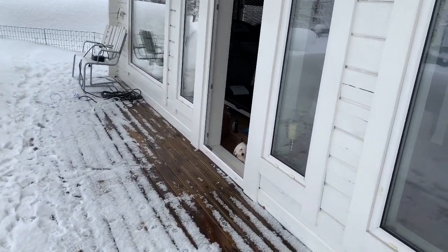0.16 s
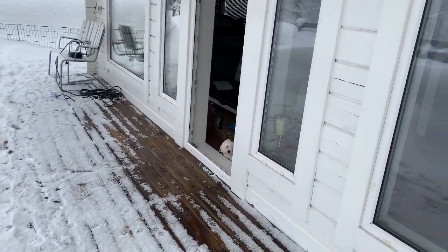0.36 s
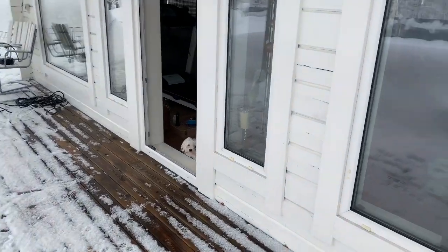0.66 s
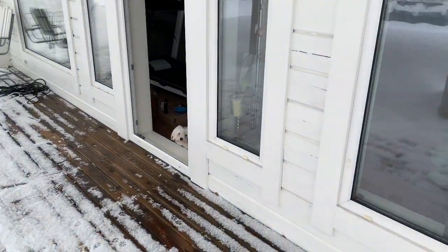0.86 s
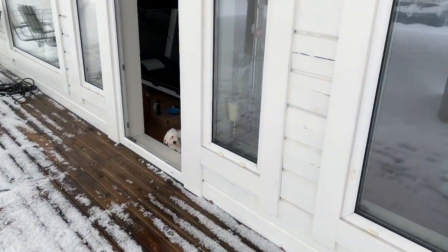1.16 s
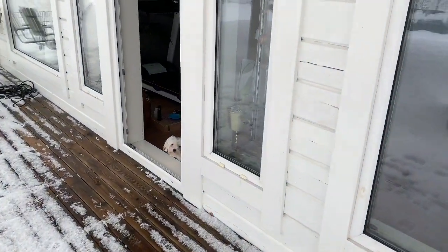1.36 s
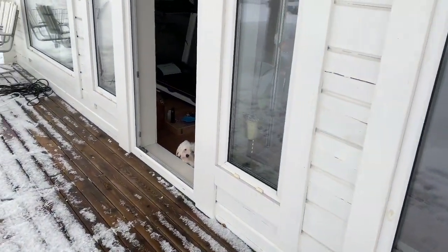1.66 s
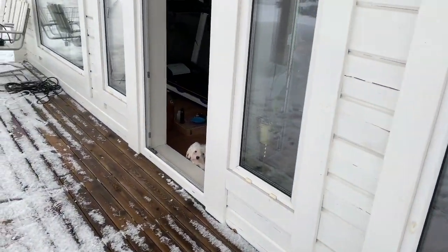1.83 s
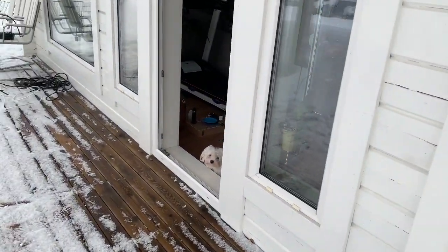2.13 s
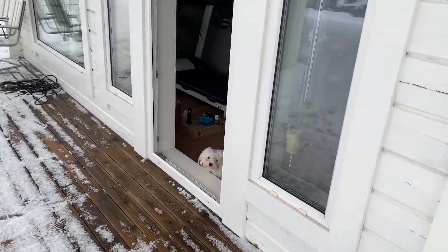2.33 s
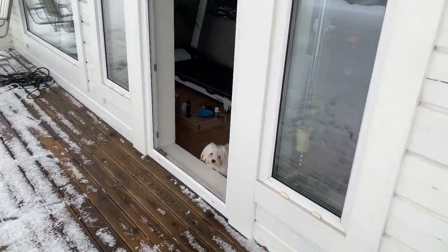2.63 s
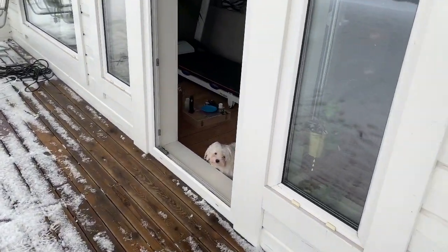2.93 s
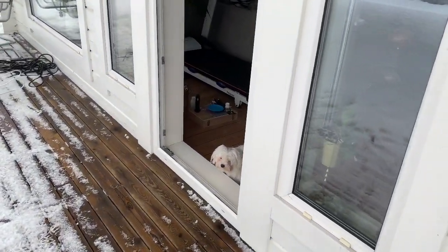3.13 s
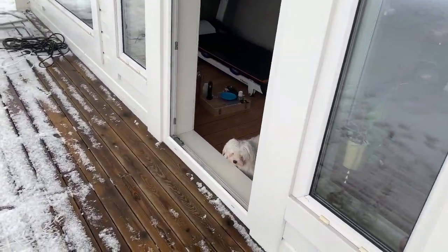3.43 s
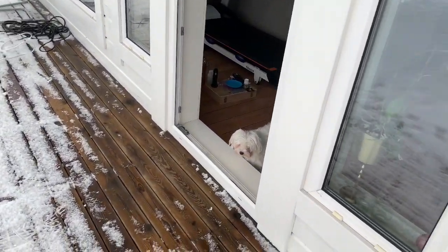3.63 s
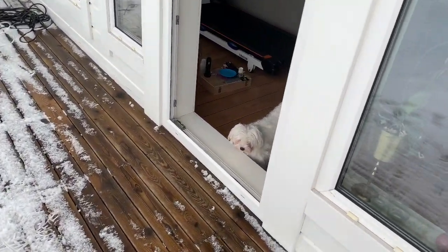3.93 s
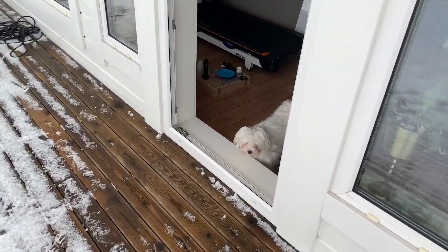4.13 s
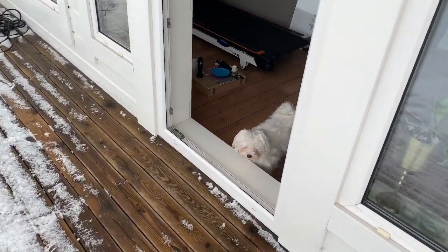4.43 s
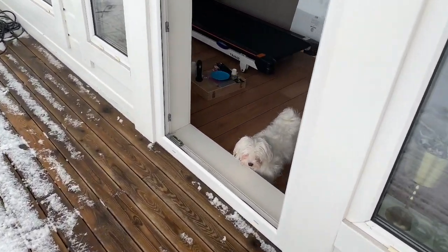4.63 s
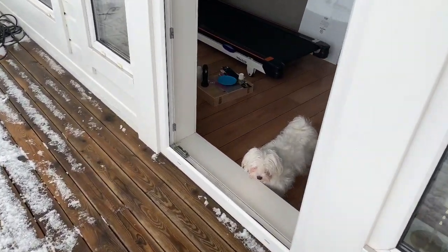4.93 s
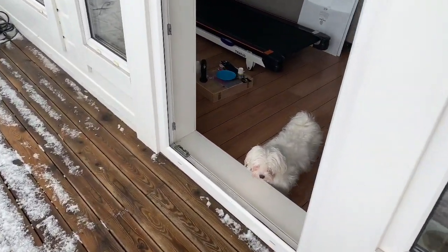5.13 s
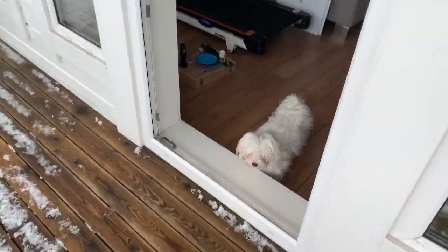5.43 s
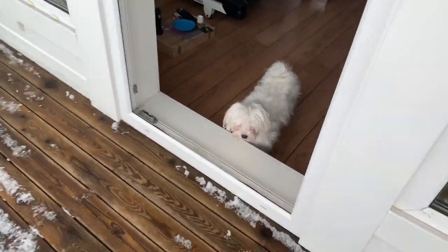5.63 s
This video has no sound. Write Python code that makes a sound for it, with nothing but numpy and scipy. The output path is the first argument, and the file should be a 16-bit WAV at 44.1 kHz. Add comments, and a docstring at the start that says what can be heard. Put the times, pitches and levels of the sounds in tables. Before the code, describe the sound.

Close, dry outdoor footsteps on a snow-dusted wooden deck, caught by a phone held above. Woody knocks with short low thuds arrive in uneven groups, each ringing briefly through the boards. Breathy scuffs of soles and clothes, tiny clicks and dull bass bumps fill the spaces over a very faint steady hiss. The last second has no strong step, just shuffling.

```python
"""Footsteps on a wooden deck

Shoes knock and thud on boards right under a hand-held phone: decaying board modes, with hiss and clicks.
Bending waves bring each blow treble first and bass last, then return once from the end of the boards.
Between the steps soles and clothes scuff, as flickering bands of noise with a breathy hollow note; grit
ticks, slow shifts of weight bump in the bass, and only a faint steady hiss is left in the gaps."""
import sys
import numpy as np
from scipy import signal
from scipy.fft import rfft, irfft
from scipy.io import wavfile
from scipy.ndimage import uniform_filter1d

SR = 44100
rng = np.random.default_rng(int(sys.argv[2]) if len(sys.argv) > 2 else 0)


def wrap_up_sound(samples):
    """Save the sound to the file named by the first command line argument, as 16-bit audio."""
    columns = np.atleast_2d(samples).T
    # keep every value between -1 and 1, then stretch to whole-number steps
    tamed = np.clip(columns, -1, 1)
    steps = np.round(tamed * 32767).astype(np.int16)
    wavfile.write(sys.argv[1], SR, steps)


N = 255162


def undb(db):
    """Amplitude gain of a level in dB."""
    return 10 ** (np.asarray(db) / 20)


def on_log(hz, table):
    """Value of an (Hz, value) table, straight on a log-frequency axis."""
    table_hz, values = np.transpose(table)
    return np.interp(np.log(np.maximum(hz, 1)), np.log(table_hz), values)


def band(x, hz, width):
    """Resonant band-pass, gain 1 at the centre."""
    b, a = signal.iirpeak(min(hz, 0.45 * SR), hz / width, fs=SR)
    return signal.lfilter(b, a, x)


def noise(hz, width, size=N):
    """Two unrelated noises in one band, rms 1."""
    x = band(rng.standard_normal((2, size)), hz, width)
    return x / x.std()


def steep(hz, width, size=N):
    """Noise through the same resonance twice, for steeper skirts; rms 1."""
    each_width = 1.53 * width  # two passes narrow the band
    x = band(noise(hz, each_width, size), hz, each_width)
    return x / x.std()


def walk(rate):
    """Random levels that slew to a new value every 1 / rate s; spread near 1."""
    hold = int(SR / rate)
    levels = np.repeat(rng.standard_normal(N // hold + 1), hold)
    return 1.57 * uniform_filter1d(levels, hold)[:N]


def grit(size, spread_db, grain_s=0.0012):
    """Crushed crystals: a gain that jumps grain by grain, now and then far up; rms 1."""
    hold = int(grain_s * SR)
    grains = undb(spread_db * rng.exponential(size=size // hold + 1))
    gain = np.repeat(grains, hold)[:size]
    return gain / np.sqrt(np.mean(gain ** 2))


def fade(t, t60, rise):
    """Exponential onset with time constant rise after t = 0, times a decay of 60 dB in t60 s."""
    t = np.maximum(t, 0)
    return (1 - np.exp(-t / rise)) * 1000. ** (-t / t60)


def peak_one(x):
    """Scales each draw to peak 1."""
    return x / np.abs(x).max(axis=1, keepdims=True)


def add(out, x, s):
    """Mixes x into out from time s on."""
    i = int(s * SR)
    out[:, i:i + x.shape[1]] += x[:, :N - i]


# Spectrum of the faint steady hiss. Each row: frequency in Hz, relative level in dB per Hz.
FAINT_SPECTRUM = [(20, -1), (40, -0.5), (300, -21.5), (1500, -32), (4000, -55.5), (16000, -28.5)]
FAINT_DB = -71.5  # rms


def faint_hiss():
    """Faint steady background: white noise shaped by a fixed spectrum."""
    hz = np.arange(N // 2 + 1) * SR / N
    spectrum = rfft(rng.standard_normal((2, N))) * undb(on_log(hz, FAINT_SPECTRUM))
    x = irfft(spectrum, N)
    return undb(FAINT_DB) * x / x.std()


# Soles and clothes rubbing. Each row: start in seconds, length in seconds, low scuff at the start in dB,
# swell up to the end in dB, then middle scuff, bright swish and board grumble in dB re the low scuff,
# attack and release in seconds per 30 dB, hollow note in Hz, level of that note in dB re the low scuff.
SCUFFS = [(0, 0.13, -61, -14, -8, -41, 12, 0.026, 0.14, 843, -2.5),
          (0.317, 0.12, -70.5, 12, -5, -6, 7, 0.12, 0.11, 1530, -8.5),
          (0.468, 0.062, -59.5, 3.5, -6, -4.5, 18, 0.069, 0.042, 1630, -19),
          (0.641, 0.14, -70.5, 0.5, 5.5, -3, 18, 0.054, 0.16, 1184, -5.5),
          (0.84, 0.21, -75.5, -6.5, 0, -20, 8, 0.029, 0.12, 857, 6.5),
          (1.118, 0.064, -66, 10.5, -3, -7, 11, 0.088, 0.082, 1500, -10),
          (1.258, 0.3, -56, -17, -7.5, -23.5, 10.5, 0.039, 0.11, 910, -7),
          (1.857, 0.27, -65, 6.5, -5.5, -15, 4, 0.069, 0.53, 470, -5),
          (2.198, 0.38, -64, 1.5, -7.5, -14, 8, 0.043, 0.083, 2330, -6.5),
          (2.6, 0.16, -78, -7, 4, -17, 24, 0.032, 0.06, 426, 17),
          (2.813, 0.13, -67, 7.5, -1, -7, 7, 0.042, 0.095, 1366, -3),
          (3.039, 0.075, -55, -7, -16.5, -22, 5, 0.056, 0.054, 1100, -8.5),
          (3.203, 0.097, -64, 0, -17.5, -22.5, 12, 0.022, 0.062, 1930, -16.5),
          (3.606, 0.15, -58.5, -3, -2, -4.5, 0, 0.014, 0.14, 1295, -2.5),
          (3.797, 0.43, -66.5, 7.5, -14, -14, 12, 0.057, 0.1, 1070, -7.5),
          (4.278, 0.19, -66.5, 2.5, -1, -17, 9.5, 0.11, 0.046, 2450, 3.5),
          (4.441, 0.17, -63, 1.5, -3, -9, 7, 0.021, 0.09, 2450, -5.5),
          (4.638, 0.39, -65, 5, -6.5, -14.5, 0, 0.047, 0.13, 2170, -6),
          (5.125, 0.035, -69.5, -0.5, -7.5, -19, 6.5, 0.013, 0.066, 1810, -3.5),
          (5.29, 0.078, -62, 6, -2, -6.5, -3, 0.039, 0.078, 1210, 1),
          (5.451, 0.35, -65, -4, -7, -13.5, 2, 0.12, 0.063, 1170, -3),
          (5.668, 0.099, -67.5, 15.5, -8.5, -7, -31, 0.053, 0.14, 1560, -2.5)]
EDGE_DB = 30  # fall per attack or release time
SHORTEST_EDGE_S = 0.004


def stroke_db(row):
    """One scuff in time: its level in dB as it swells or sinks, and the dB its edges take off."""
    t = np.arange(N) / SR
    start, length, db, swell_db = row[:4]
    attack, release = np.maximum(row[7:9], SHORTEST_EDGE_S)
    before = np.maximum(start - t, 0) / attack
    after = np.maximum(t - start - length, 0) / release
    level_db = db + swell_db * np.clip((t - start) / length, 0, 1)
    return level_db, EDGE_DB * (before + after)


def scuffing(column, slower, rest_db):
    """Gain of one layer under all scuffs above its resting level; powers add."""
    power = undb(2 * rest_db)
    for row in SCUFFS:
        db, edges = stroke_db(row)
        layer_db = row[column] if column else 0  # column 0 is the low scuff itself
        power = power + undb(2 * (db + layer_db - edges / slower))
    return np.sqrt(power)


def rubbing(bands, gain, rate, flicker_db, grit_db):
    """Resonances fed by noise that catches and slips; each flickers and swells partly alone."""
    shared = walk(rate)
    x = np.zeros((2, N))
    for hz, width, db in bands:
        flicker = shared + walk(rate) + 0.4 * walk(8)
        x += undb(db + flicker_db * flicker) * steep(hz, width)
    x = x * uniform_filter1d(grit(N, grit_db), size=24)
    return gain * x / x.std()


# Grumble bands of the boards. Each row: centre in Hz, width in Hz, relative level in dB.
GRUMBLE_BANDS = [(43, 20, 5), (100, 110, -3.5), (211, 303, 2.5), (400, 160, -4.5)]
# What remains between scuffs: four levels in dB, for grumble, low scuff, middle scuff and bright swish.
REST_DB = [-90.5, -89.5, -86, -86]
AFTER_BLOW_DB, AFTER_BLOW_T60_S = -20.5, 0.38  # grumble that a blow leaves: dB re its knock, and decay
GRUMBLE_SLOWER = 1.84  # the boards load and settle this many times more slowly than the scuff


def board_grumble():
    """Low noise of the loaded boards: they work under each scuff and settle after each blow."""
    t = np.arange(N) / SR
    settle = np.zeros(N)
    for s, knock_db, *_ in BLOWS:
        left = undb(knock_db + AFTER_BLOW_DB) * fade(t - s, AFTER_BLOW_T60_S, rise=0.037)
        settle += left ** 2
    work = scuffing(column=6, slower=GRUMBLE_SLOWER, rest_db=REST_DB[0])
    return rubbing(GRUMBLE_BANDS, np.sqrt(work ** 2 + settle), rate=25, flicker_db=1.42, grit_db=0)


# Low, middle and bright rubbing bands. Each row: centre in Hz, width in Hz, relative level in dB.
SCUFF_LOW = [(337.5, 45, 3.5), (440, 87, 3), (834, 490, 12.5), (1260, 250, 5), (1630, 330, 3)]
SCUFF_MID = [(2250, 860, 1.5), (3100, 560, -4.5), (3800, 1000, -2), (5370, 1600, -6.5)]
SCUFF_TOP = [(5000, 1800, 0.5), (8100, 2800, 3.5)]
SLIPS_PER_S = 60  # new flicker levels a second


def scuffs():
    """Soles and clothes rub: three layers of gritty noise, each following the strokes at its own level."""
    out = np.zeros((2, N))
    layers = [(SCUFF_LOW, 0, REST_DB[1]), (SCUFF_MID, 4, REST_DB[2]), (SCUFF_TOP, 5, REST_DB[3])]
    for bands, column, rest_db in layers:
        gain = scuffing(column, slower=1, rest_db=rest_db)
        out += rubbing(bands, gain, SLIPS_PER_S, flicker_db=1.5, grit_db=2.0)
    return out


# Thinnest hiss of the rubbing. Each row: centre in Hz, width in Hz, relative level in dB.
THIN_HISS = [(13500, 4000, 0)]
HISS_DB, HISS_POWER = 26, 1.5  # gain on the swish raised to this power


def thin_hiss():
    """The highest rubbing noise: it grows faster than the bright swish."""
    swish = scuffing(column=5, slower=0.93, rest_db=REST_DB[3])
    gain = undb(HISS_DB) * swish ** HISS_POWER
    return rubbing(THIN_HISS, gain, SLIPS_PER_S, flicker_db=2.0, grit_db=1.5)


# Resonances of the hollow. Each row: multiple of the hollow note, width as a share of the note, level in dB.
HOLLOW = [(1, 0.2, -2), (2.25, 0.25, -7.5)]


def hollow_notes():
    """Each scuff has its own breathy note, from the hollow between sole, cloth and board."""
    out = np.zeros((2, N))
    for row in SCUFFS:
        start, length, attack, release, note_hz, note_db = *row[:2], *row[7:]
        db, edges = stroke_db(row)
        first = max(int((start - attack) * SR), 0)
        last = min(int((start + length + release) * SR), N)
        breath = np.zeros((2, last - first))
        for multiple, width, part_db in HOLLOW:
            breath += undb(part_db) * steep(multiple * note_hz, width * note_hz, size=last - first)
        level_db = db - edges + 1.3 * walk(30)
        add(out, undb(level_db[first:last] + note_db) * breath, first / SR)
    return out


# Grit ticks. Each row: start in seconds, peak level in dB, pitch in Hz.
TICKS = [(0.158, -59.5, 6060), (.501, -39, 7240), (1.537, -50, 2960), (2.072, -50.5, 3020),
         (3.604, -48, 1650), (4.879, -46.5, 6360), (4.905, -45.5, 3000), (4.937, -51, 2300),
         (5.063, -58, 5100), (5.693, -41, 1910)]


def ticks():
    """Grit clicks: tiny bursts of narrow noise that ring a few cycles."""
    out, t = np.zeros((2, N)), np.arange(SR // 20) / SR
    for s, db, hz in TICKS:
        click = steep(hz, 0.36 * hz, size=len(t)) * fade(t, t60=0.022, rise=0.00024)
        add(out, undb(db) * peak_one(click), s)
    return out


# Soft shifts of weight, bass only. Each row: start in seconds, peak level in dB, pitch in Hz.
SHIFTS = [(2.29, -47, 58.6), (2.378, -49.5, 71.5), (2.477, -49, 41.2), (2.815, -42, 48),
          (3.075, -36.5, 108), (3.608, -37.5, 56), (3.659, -40, 98), (5.387, -40.5, 44), (5.477, -48, 107),
          (5.757, -40, 100)]


def shifts():
    """A slow push bends the boards: a dull bump of a few uneven cycles of low noise."""
    out, t = np.zeros((2, N)), np.arange(SR // 4) / SR
    for s, db, hz in SHIFTS:
        settled = steep(hz, 0.51 * hz, size=SR // 2)[:, -len(t):]  # skip the filter's own build-up
        add(out, undb(db) * peak_one(settled * fade(t, t60=0.13, rise=0.015)), s)
    return out


TRAVEL_S = 0.01175  # travel time of a 100 Hz bending wave


def travel(hz):
    """Bending waves run as the root of frequency; the wait in s counts from the treble front (2500 Hz)."""
    return TRAVEL_S * (np.sqrt(100 / hz) - 0.2)


RETURN_S, RETURN_PATHS, RETURN_DB = 0.008, 1.774, -6  # echo: extra delay, path ratio, dB re the first wave
FAVOUR_DB, FAVOUR_OCTAVES = 7, 0.22  # lift of the modes near a blow's pitch, and how far it reaches


def ring(modes, t, pitch_hz, hard_db=0):
    """Two draws of one blow: each spot of the deck weights and detunes the modes anew; peak 1."""
    hz, db, t60 = np.transpose(modes)[:, :, None]
    size, tune = rng.standard_normal((2, 2, len(modes), 1))
    favour_db = FAVOUR_DB * np.exp(-(np.log2(hz / pitch_hz) / FAVOUR_OCTAVES) ** 2)
    late = t - travel(hz)
    # loose boards trade energy, so each mode's ring wavers every few ms
    levels = rng.standard_normal((2, len(modes), len(t) // 256 + 1))
    held = np.repeat(levels, 256, axis=2)[:, :, :len(t)]
    rattle = undb(3 * uniform_filter1d(held, size=200))
    # the first wave passes in a few cycles, before the boards ring on more softly
    front_db, front_t60 = 13, 4.85 / hz
    shape = rattle * fade(late, t60, 0.5 / hz) + undb(front_db) * fade(late, front_t60, 0.62 / hz)
    waves = np.sin(2 * np.pi * hz * (1 + 0.023 * tune) * late) * shape
    # it comes back once from the end of the boards, over a longer path
    back = t - RETURN_S - RETURN_PATHS * travel(hz)
    echo = np.sin(2 * np.pi * hz * back) * fade(back, front_t60, 0.51 / hz)
    waves = waves + undb(front_db + RETURN_DB) * echo
    mode_db = db + favour_db + hard_db * np.log2(hz) + 1.72 * size
    return peak_one(np.sum(undb(mode_db) * waves, axis=1))


# Dense after-ring of the joists. Each row: centre in Hz, level in dB re the blow, 60 dB decay in seconds.
AFTER_RING = [(56.5, -16, 0.63), (146.2, -20, 0.73), (329, -25, 0.2), (603, -22, 0.24), (1120, -27.5, 0.19),
              (2260, -36, 0.12)]


def after_ring(t, thud_db, boom_db, hard_db):
    """The joists ring on as bands of decaying noise, driven by the boom, thud or knock near their pitch."""
    out = np.zeros((2, len(t)))
    for hz, after_db, t60 in AFTER_RING:
        drive_db = np.interp(hz, [60, 200, 600], [boom_db, thud_db, 0])
        drive_db += hard_db * max(np.log2(hz / 600), 0)
        dense = steep(hz, 0.52 * hz, size=len(t))
        out += undb(after_db + drive_db) * dense * fade(t - travel(hz), t60, rise=0.0011)
    return out


# Hiss of sole and snow. Each row: centre in Hz, width in Hz, relative level in dB.
CRACK_BANDS = [(3330, 1500, 11), (5030, 830, 6.5), (9100, 1000, 2), (13200, 2600, -2)]


def crack(t):
    """The sole slaps and crushes snow: a short gritty hiss with a fainter tail."""
    hiss = sum(undb(db) * noise(hz, width, len(t)) for hz, width, db in CRACK_BANDS)
    tail = undb(1) * fade(t, 0.05, 0.0013) + undb(-3.5) * fade(t, 0.16, 0.0013)
    return hiss / np.abs(hiss).max() * grit(len(t), spread_db=2.0) * tail


SNAP_DB, SNAP_PER_HARD = -26.5, 1.8  # click re knock at hardness 0, and its gain per dB of hardness


def snap(t, hard_db):
    """Click of the first contact, louder for a harder blow up to a limit."""
    db = SNAP_DB + SNAP_PER_HARD * min(hard_db, 4)
    return undb(db) * steep(2500, 2600, size=len(t)) * fade(t, t60=0.014, rise=0.0017)


# Deck modes of boom, thud and knock. Each row: frequency in Hz, relative level in dB, 60 dB decay in seconds.
BOOM_MODES = [(35.5, 0, 0.05), (45, -0.5, 0.083), (58.3, -1, 0.13)]
THUD_MODES = [(129, 0, 0.14), (155.5, 4, 0.1), (177.5, 3.5, 0.19), (205.9, -3, 0.15), (289.2, -7, 0.25)]
KNOCK_MODES = [(338.5, 0.5, 0.15), (388.5, -2, 0.17), (434.2, 5, 0.082), (497.2, -2, 0.12),
               (601, -2, 0.064), (668.6, -1, 0.12), (867.5, 0.5, 0.057), (959, -8, 0.15),
               (1046, -2.5, 0.071), (1215, -3, 0.079), (1352, -2.5, 0.04), (1567, -11.5, 0.12),
               (1744, -16.5, 0.093), (1910, -21.5, 0.057), (2360, -15.5, 0.038)]
# Heel and toe blows. Each row: start in seconds, knock in dB, then thud, boom and crack in dB re the knock,
# hardness in dB per octave, knock pitch in Hz, thud pitch in Hz.
BLOWS = [(0.445, -34.5, 6, -5, -32, -3, 336, 177), (0.479, -24.5, -3, -1, -33, -2.5, 620, 183),
         (0.52, -16.5, -2.5, -7, -32, -4.5, 354, 177), (0.558, -25, -3, -4.5, -17, -2, 420, 188),
         (0.629, -22.5, -3.5, 0.5, -23, -1.5, 480, 172), (0.684, -19.5, 6, -0.5, -19, -3, 493, 177),
         (0.804, -28.5, 6.5, 1, -19, 0, 880, 166), (0.885, -42.5, 13, -12, -15.5, 0.5, 510, 166),
         (0.953, -31.5, 11, 3, -15, -3, 423, 172), (1.182, -38, 1.5, 3, -21, 0, 824, 204),
         (1.259, -16.5, 0.5, -4.5, -20, 2, 665, 199), (1.358, -36, -1, -10, -15, -2.5, 516, 285),
         (2.036, -28, -1.5, -10.5, -47, -6.5, 646, 199), (2.177, -17, -15, -7.5, -25, 1, 426, 170),
         (2.209, -35.5, 6.5, -14.5, 0, 12, 1200, 166), (2.551, -19.5, -2.5, -12, -18.5, 4.5, 425, 199),
         (2.959, -33.5, 6, 0, -30, -1.5, 1230, 199), (3.026, -25.5, -3, -12.5, -25, 2, 580, 134),
         (3.07, -40.5, 6, -4, -9.5, 4.5, 870, 134), (3.109, -32, 4, -0.5, -17.5, 1.5, 890, 150),
         (3.218, -30, -2.5, -23, -28, 4, 900, 285), (3.243, -38, 3.5, -15, -25, -2, 432, 202),
         (3.913, -24.5, -5, -13, -33, 0.5, 484, 280), (3.97, -24.5, 6, -17, -18, 1, 387, 156),
         (4.089, -12.5, -9, -16, -33.5, 0, 714, 130), (4.118, -26.5, -0.5, -22.5, -30, -3, 447, 209),
         (4.178, -35.5, 3.5, -9, -23, -3, 560, 130), (4.223, -37.5, 8.5, -40, -16, -0.5, 627, 123),
         (4.433, -47, 19, 8.5, 2, 13, 920, 156), (4.605, -30.5, 1, -2.5, -27, -4, 415, 139),
         (4.677, -19, -0.5, -6, -26, -1, 430, 161), (4.802, -14, 0.5, -11, -27, 3, 755, 150),
         (5.127, -51.5, -12, -18, 0.5, 2.5, 600, 160)]


def blows():
    """Heels and toes strike the deck: each blow sets off its modes, after-ring, crack and snap."""
    out, t = np.zeros((2, N)), np.arange(SR // 3) / SR
    taper = np.cos(t / t[-1] * np.pi / 2)  # the last faint ring tapers away
    for s, db, thud_db, boom_db, crack_db, hard_db, knock_hz, thud_hz in BLOWS:
        x = ring(KNOCK_MODES, t, knock_hz, hard_db)
        x += undb(thud_db) * ring(THUD_MODES, t, thud_hz)
        x += undb(boom_db) * ring(BOOM_MODES, t, pitch_hz=49.9)
        x += after_ring(t, thud_db, boom_db, hard_db)
        x += undb(crack_db) * crack(t)
        x += snap(t, hard_db)
        add(out, undb(db) * x * taper, s)
    return out


# Level of the part that differs between the two ports. Each row: frequency in Hz, level in dB.
UNLIKE = [(30, -26), (125, -16.5), (300, -11), (700, -6), (1200, -4.5), (2000, -2.5), (4500, -4),
          (7500, -12), (15000, -18)]
# Phase by which the left port leads. Each row: frequency in Hz, lead in radians.
LEFT_LEADS = [(0, 0), (950, 0.47), (1700, -0.16), (3000, 1.92), (4300, 1.67), (5600, 3.5), (7300, 7),
              (10400, 2.5), (13500, 1), (16000, -2)]
# Balance of the ports. Each row: frequency in Hz, left minus right in dB.
BALANCE_DB = [(200, -1.5), (700, 0.5), (5000, -1), (15000, 0)]


def two_ports(both):
    """One draw reaches both ports, phase-shifted by the phone body; the other differs between them."""
    hz = np.arange(N // 2 + 1) * SR / N
    shared, own = rfft(both)
    own = own * undb(on_log(hz, UNLIKE))
    # each port takes half of the lead and half of the balance
    shift = np.exp(0.5j * np.interp(hz, *np.transpose(LEFT_LEADS)))
    tilt = undb(on_log(hz, BALANCE_DB) / 2)
    left = (shared + own) * shift * tilt
    right = (shared - own) / shift / tilt
    return irfft([left, right], N)


def scene():
    """All layers as two draws each, summed and spread over the two ports."""
    rubs = board_grumble() + scuffs() + thin_hiss() + hollow_notes()
    return two_ports(faint_hiss() + rubs + ticks() + shifts() + blows())


TOP_HZ = 15800


def record(dry):
    """A steep low-pass cuts the top."""
    low_pass = signal.ellip(10, 0.2, 70, TOP_HZ, fs=SR, output="sos")
    return signal.sosfilt(low_pass, dry)


dry = scene()
out = record(dry)
wrap_up_sound(out)
```